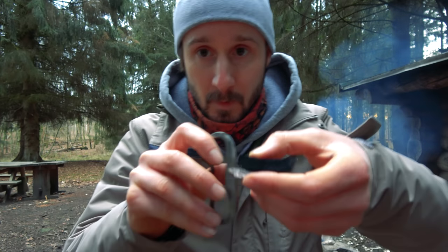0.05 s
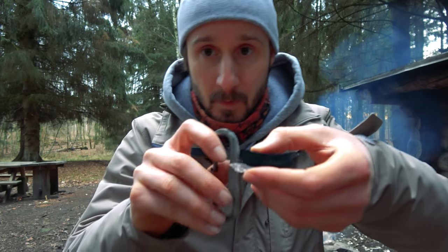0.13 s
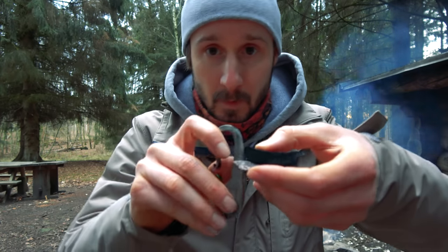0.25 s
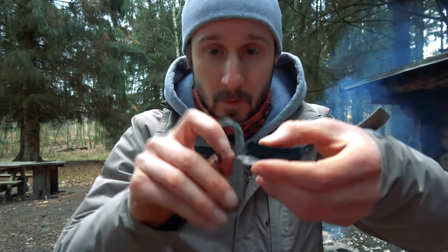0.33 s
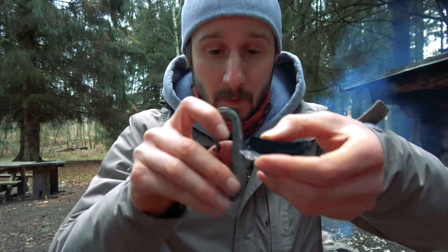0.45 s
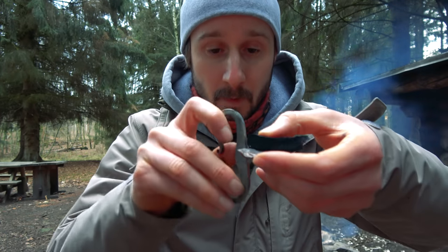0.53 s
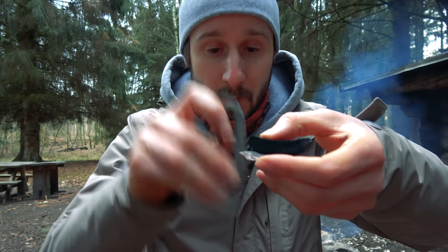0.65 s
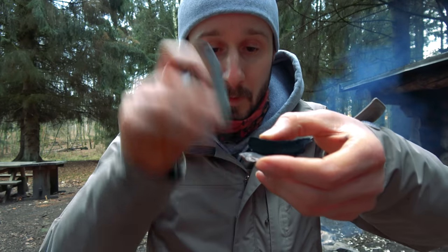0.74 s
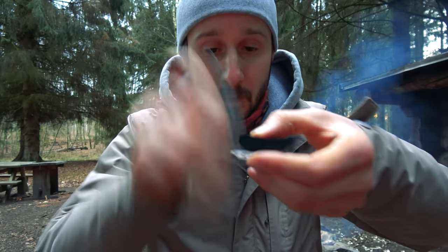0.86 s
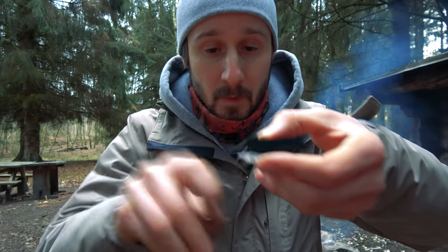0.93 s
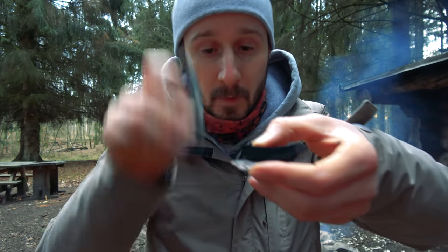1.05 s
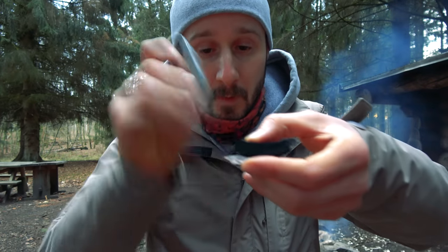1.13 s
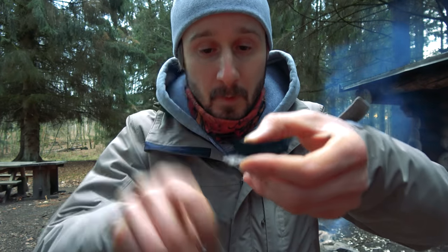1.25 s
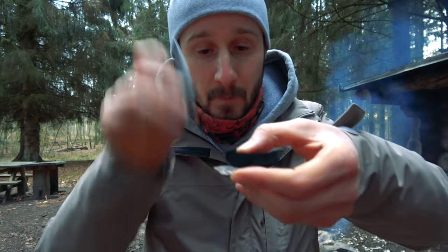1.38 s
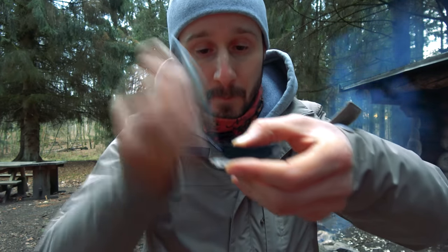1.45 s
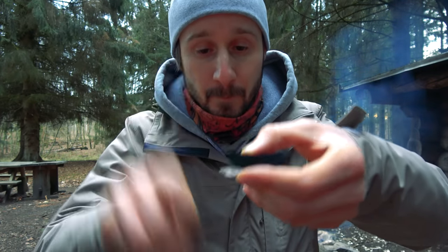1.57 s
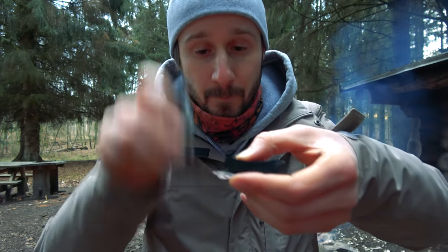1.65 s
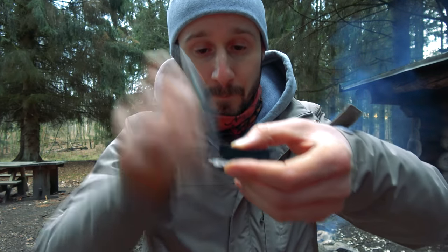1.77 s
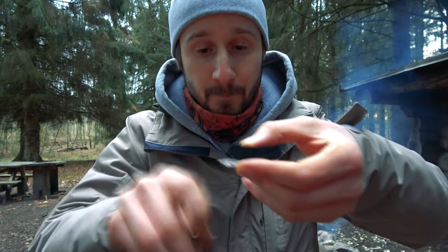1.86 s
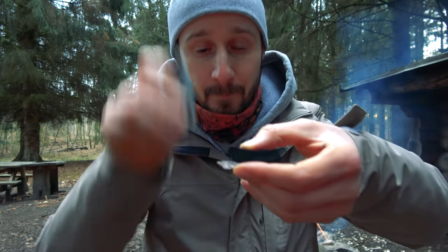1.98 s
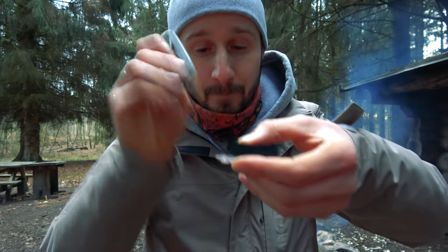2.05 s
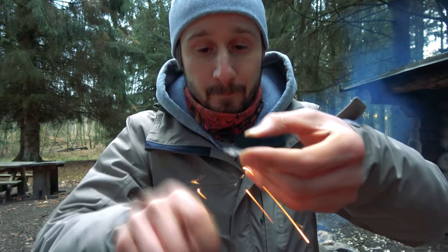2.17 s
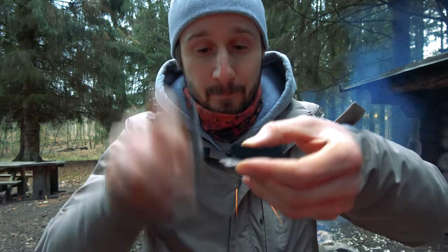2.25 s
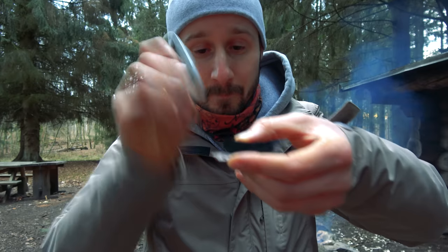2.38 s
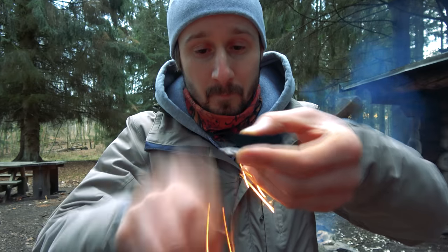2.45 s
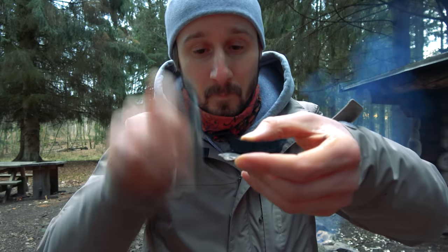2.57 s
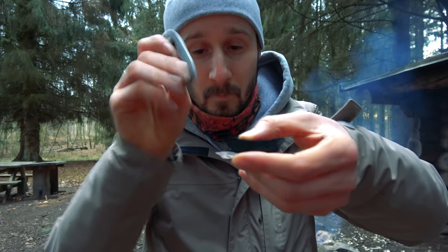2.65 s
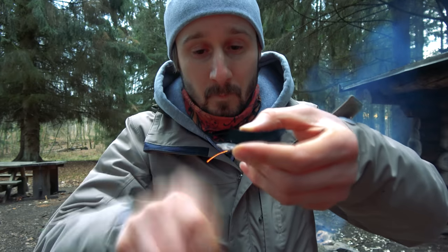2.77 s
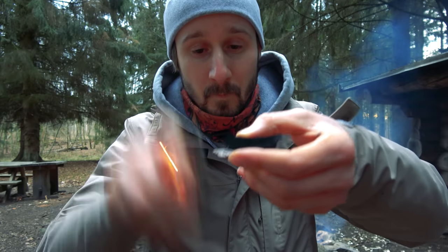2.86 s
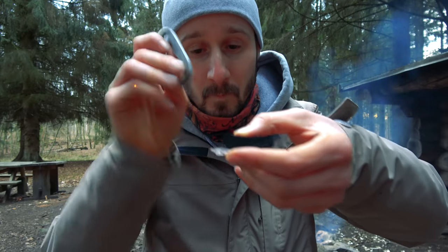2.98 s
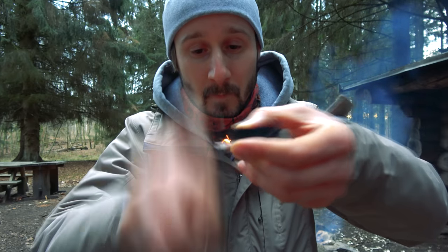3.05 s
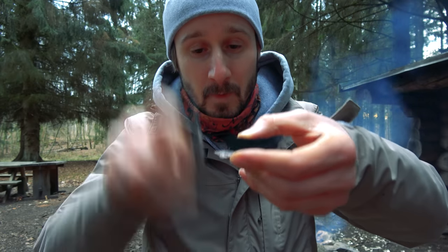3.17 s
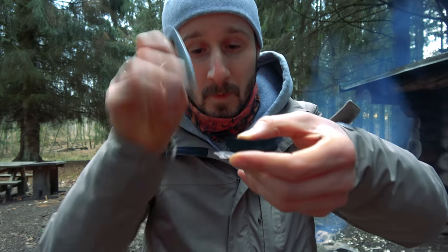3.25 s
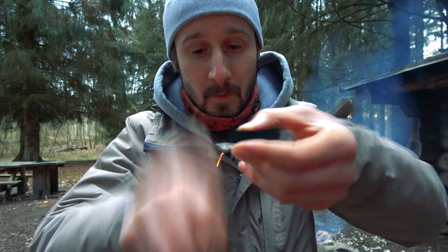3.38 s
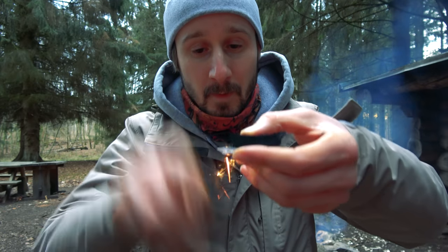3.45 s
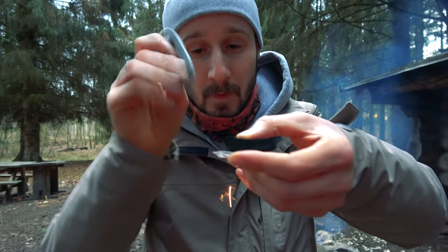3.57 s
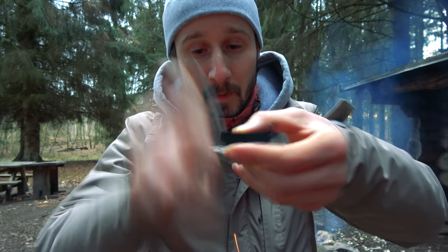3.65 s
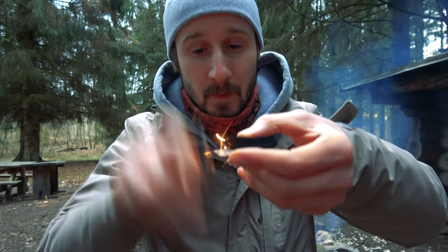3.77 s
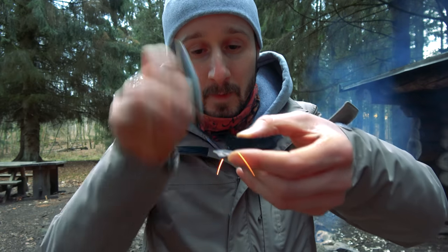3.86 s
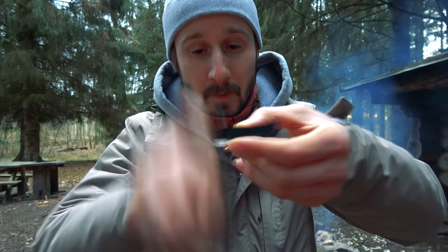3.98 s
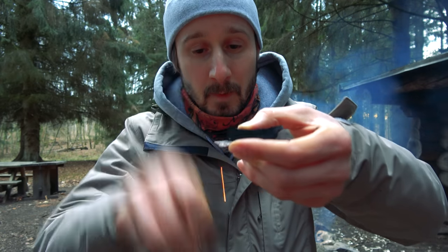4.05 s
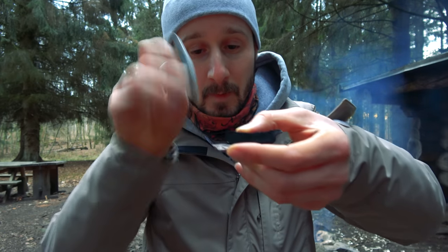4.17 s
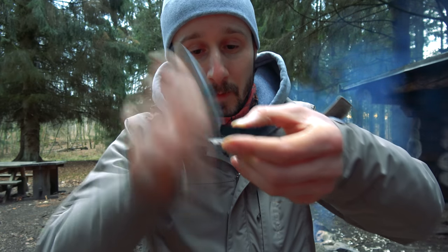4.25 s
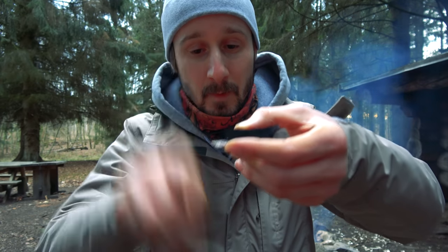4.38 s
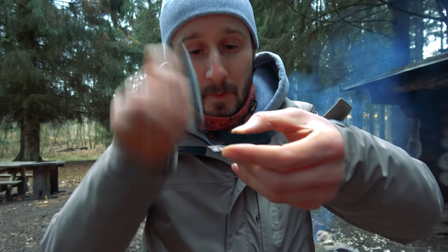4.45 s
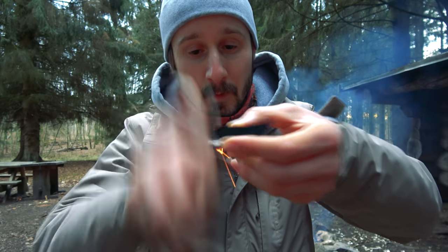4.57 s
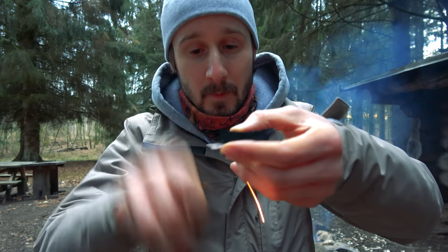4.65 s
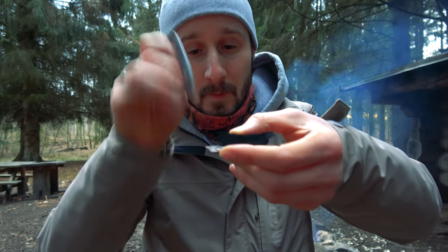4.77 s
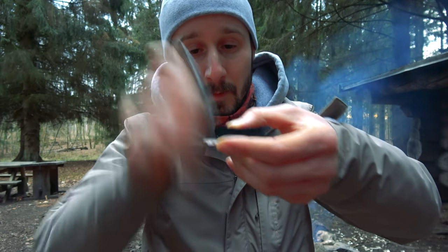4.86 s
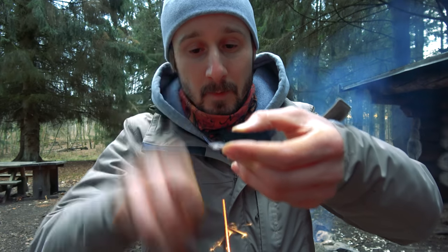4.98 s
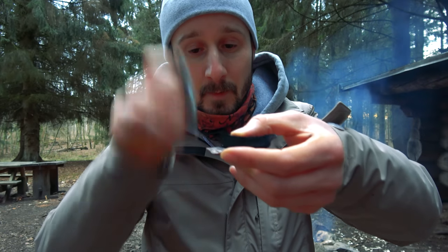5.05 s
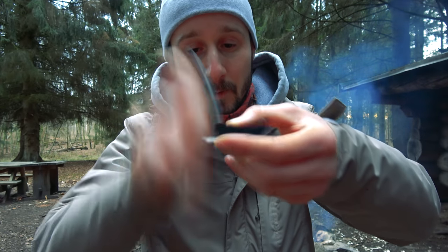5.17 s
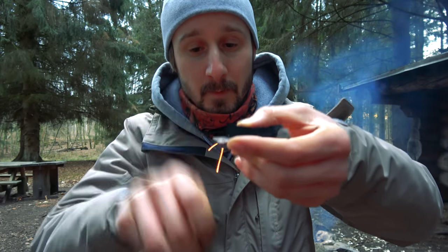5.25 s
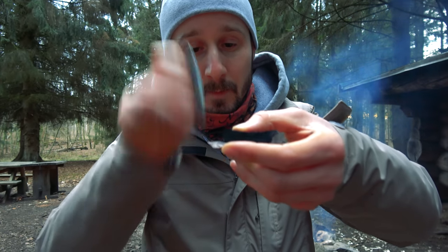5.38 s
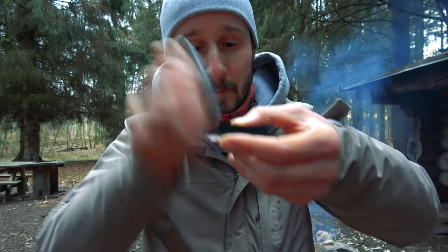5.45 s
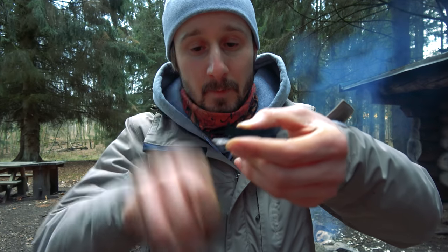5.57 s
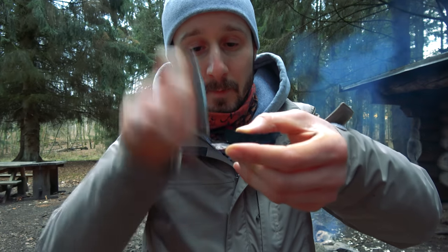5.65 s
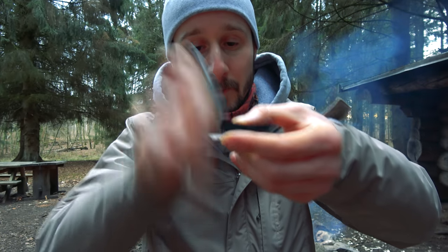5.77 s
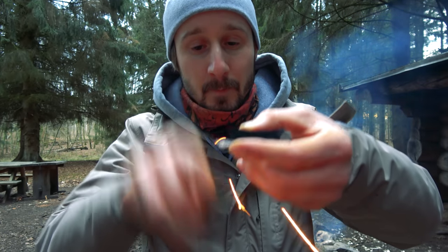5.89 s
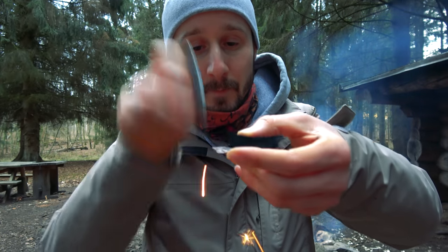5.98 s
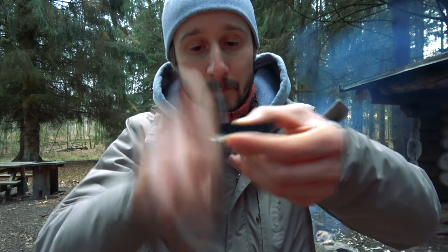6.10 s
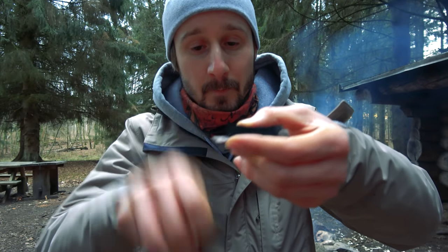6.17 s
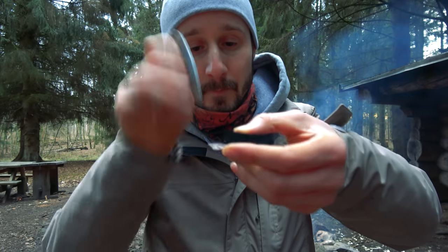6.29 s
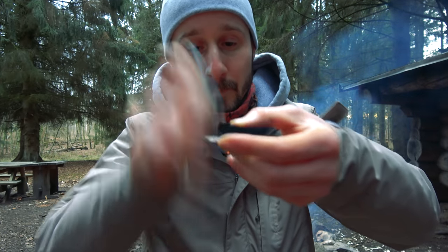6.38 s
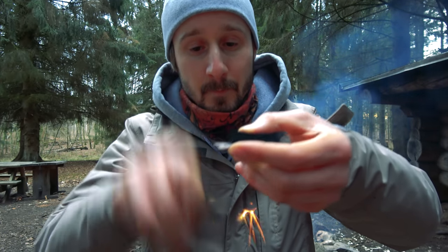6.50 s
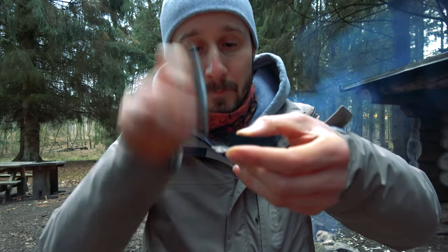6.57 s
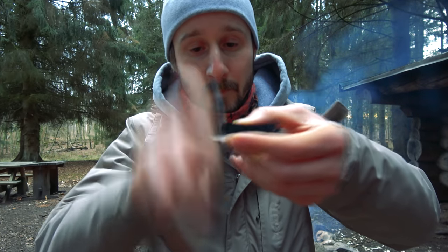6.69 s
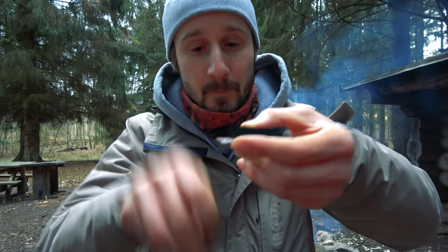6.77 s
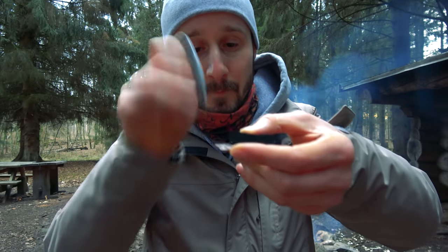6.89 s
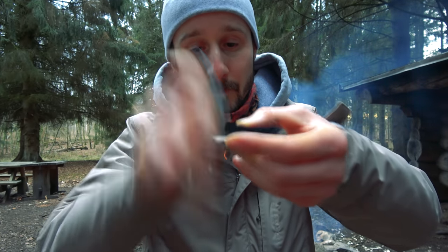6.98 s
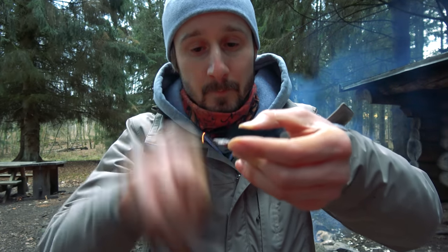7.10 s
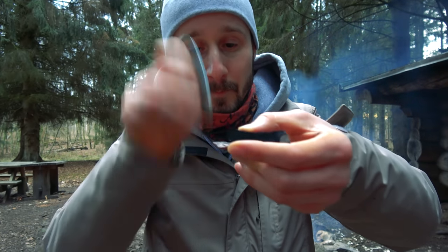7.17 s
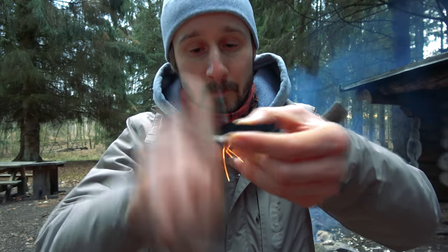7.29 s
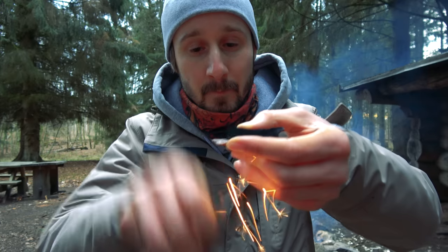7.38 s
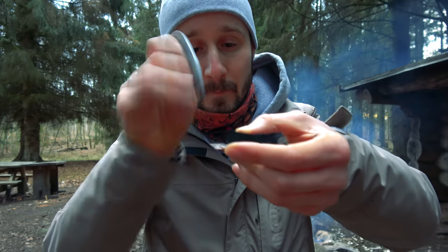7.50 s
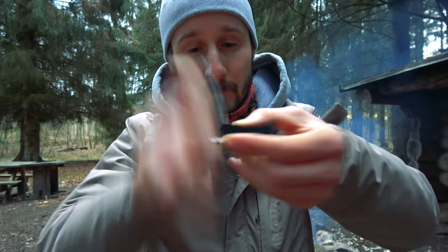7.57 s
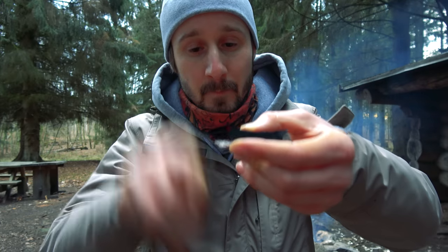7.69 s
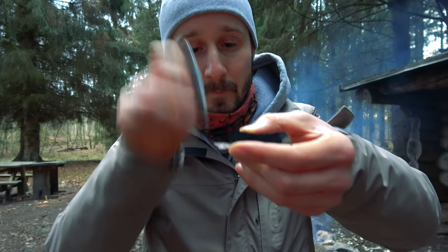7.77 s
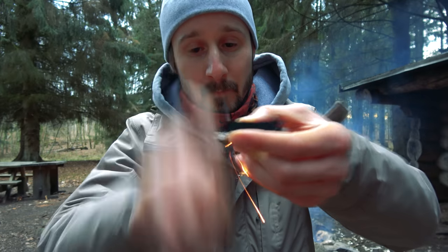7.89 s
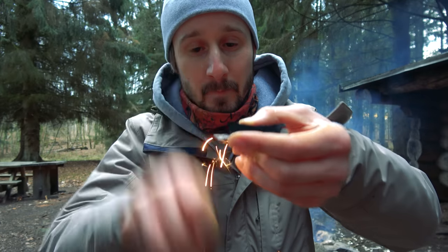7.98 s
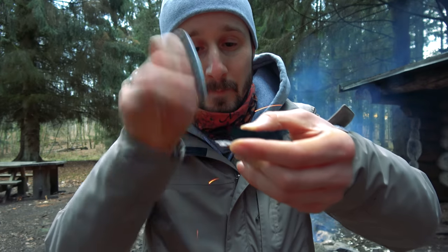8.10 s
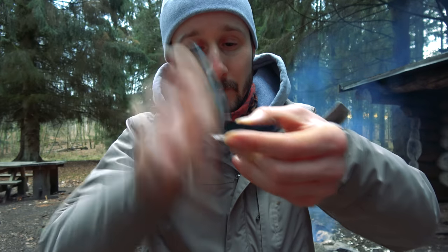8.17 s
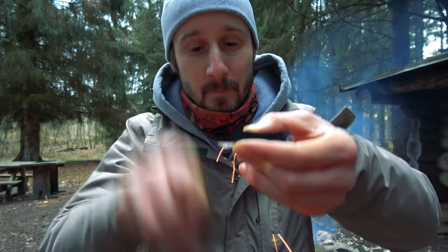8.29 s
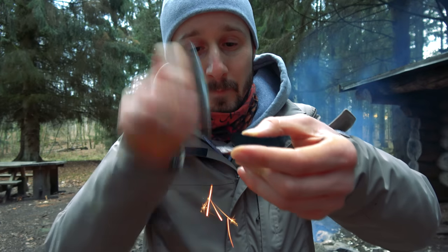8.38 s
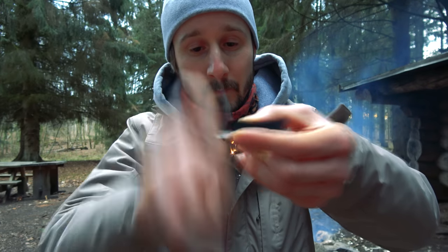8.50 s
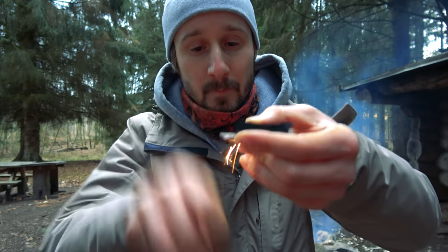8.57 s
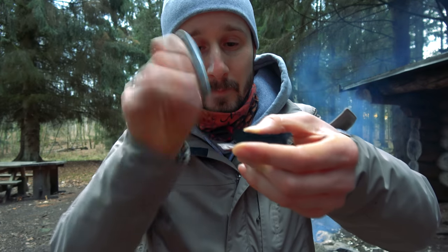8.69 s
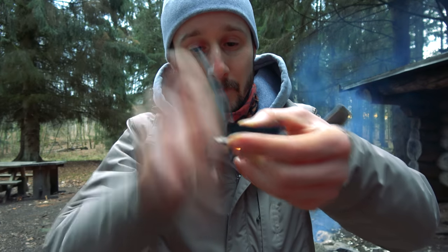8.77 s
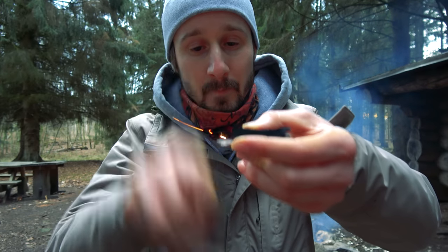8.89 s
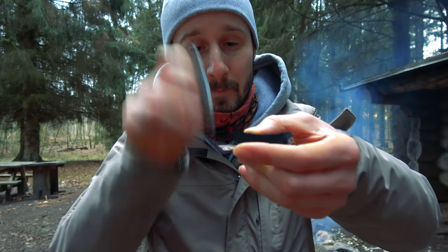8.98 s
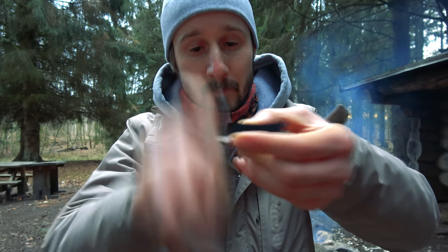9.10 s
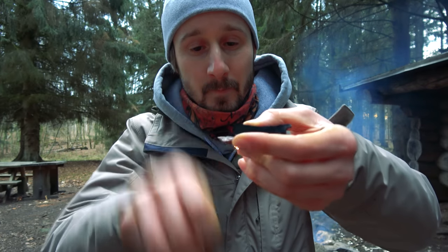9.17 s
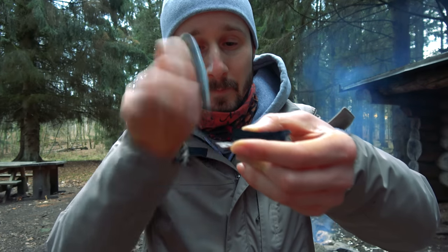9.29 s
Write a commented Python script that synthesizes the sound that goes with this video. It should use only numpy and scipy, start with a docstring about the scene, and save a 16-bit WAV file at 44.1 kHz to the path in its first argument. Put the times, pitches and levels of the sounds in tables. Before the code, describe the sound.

Quick regular strokes of steel on flint, crisp and metallic, with tiny spark ticks, sleeve rustle and soft air puffs outdoors.

```python
"""In a forest clearing, a steel fire striker is struck down the edge of a hand-held flint three times a second.
Each stroke is an impulsive blow and a 20 ms stick-slip scrape; both excite damped modes of steel and stone.
The steel rings on faintly, sparks and stone chips tick, and the moving fist pushes a puff of air.
Between strokes come light ticks and the broadband rustle of a jacket sleeve.
Trees and ground scatter a faint tail of the contacts over a bed of coloured air noise."""
import sys
import numpy as np
from scipy import signal
from scipy.fft import rfft, irfft, next_fast_len
from scipy.io import wavfile

SR = 44100
rng = np.random.default_rng(int(sys.argv[2]) if len(sys.argv) > 2 else 0)


def generate_wav(sig):
    """Save sig (samples, or channels by samples) to the path in sys.argv[1] as 16-bit PCM at SR."""
    pcm = np.round(np.clip(np.atleast_2d(sig).T, -1, 1) * 32767).astype(np.int16)
    wavfile.write(sys.argv[1], SR, pcm)


N = 411894


def from_db(db):
    """Logarithmic level: decibels to amplitude gain."""
    return 10 ** (np.asarray(db) / 20)


def rms_one(x):
    """Normalisation: scale a signal to unit rms."""
    return x / np.sqrt(np.mean(x ** 2) + 1e-20)


def seconds(size):
    """Sampling: the time axis of so many samples, in seconds."""
    return np.arange(size) / SR


def add(out, s, sound):
    """Superposition: mix a sound in from time s."""
    at = max(round(s * SR), 0)
    out[at:at + len(sound)] += sound[:max(N - at, 0)]


def bump(t, at_s, width_s):
    """Gaussian pulse: a smooth swell of height 1."""
    return np.exp(-((t - at_s) / width_s) ** 2)


def coloured(x, spectrum):
    """Spectral shaping: weight a signal by levels interpolated over log frequency; rms 1."""
    hz, db = np.transpose(spectrum)
    size = next_fast_len(len(x))
    bins = np.maximum(np.fft.rfftfreq(size, 1 / SR), 1)
    gain = from_db(np.interp(np.log(bins), np.log(hz), db))
    return rms_one(irfft(rfft(x, size) * gain, size)[:len(x)])


def drift(rate, size):
    """Slow random modulation: normal random values, rate per second, joined by straight lines."""
    knots = rng.standard_normal(int(size / SR * rate) + 2)
    return np.interp(np.arange(size) / SR * rate, np.arange(len(knots)), knots)


def grit(per_s, spread_db, size):
    """Shot noise: tiny fractures at random moments, of uneven size and either sign; rms 1."""
    size_db = spread_db * np.minimum(rng.exponential(1, size), 4)
    fractures = from_db(size_db) * rng.choice([-1, 1], size)
    return rms_one(fractures * (rng.random(size) < per_s / SR))


def resonate(x, hz, width_hz):
    """Damped oscillator: a two-pole resonance with gain 1 at its peak."""
    r = np.exp(-np.pi * width_hz / SR)
    zeros = np.array([1, 0, -1]) * (1 - r * r) / 2
    poles = [1, -2 * r * np.cos(2 * np.pi * hz / SR), r * r]
    return signal.lfilter(zeros, poles, x + 1e-18)


# strokes of steel down the flint; contact levels stand before the trims in strikes():
# (time [s], impact thud [dB], impact clack [dB], impact clink [dB], impact zing [dB], scrape length [s],
#  deepest snag after the blow [s], scrape clack [dB], scrape clink [dB], scrape zing [dB])
STROKES = [(0.9576, -38.5, -24, -20, -14, 0.022, 0.0082, -24.5, -25, -21),
           (1.2735, -38, -25, -19.5, -17.5, .013, .004, -24.5, -23.5, -14),
           (1.5736, -35, -25, -22, -16.5, 0.018, 0.0078, -27.5, -20, -21.5),
           (1.8867, -43, -20, -20, -14.5, 0.023, 0.0099, -31.5, -26.5, -25.5),
           (2.1993, -37, -15.5, -13.5, -12.5, 0.017, .007, -23.5, -20, -21),
           (2.5053, -42.5, -18.5, -18.5, -14, 0.022, 0.0066, -20.5, -18, -22.5),
           (2.8201, -32.5, -20.5, -17.5, -12, .018, 0.0045, -24, -19.5, -17),
           (3.1233, -29.5, -23, -15.5, -9.5, .023, 0.011, -25.5, -21, -21),
           (3.4356, -31.5, -13.5, -9.5, -6.5, 0.017, 0.019, -28, -23.5, -26),
           (3.7425, -30, -14, -9.5, -4, .023, 0.022, -27, -24.5, -26.5),
           (4.0484, -32, -15.5, -14.5, -16, .017, 0.0024, -20.5, -20, -23.5),
           (4.3562, -28.5, -14.5, -14, -9.5, 0.017, 0.0083, -22.5, -17, -24),
           (4.6526, -24, -7, -10.5, -11, 0.02, 0.0089, -26, -24.5, -26),
           (4.963, -48, -15.5, -10.5, -6.5, 0.018, 0.014, -28.5, -24, -29),
           (5.2659, -28, -16, -11, -8.5, .027, 0.0085, -24, -19.5, -16.5),
           (5.568, -33, -15, -13.5, -18, 0.021, .011, -24, -17.5, -17.5),
           (5.8716, -25, -12.5, -8.5, -5.5, 0.025, 0.011, -25, -19.5, -25),
           (6.1711, -32, -13.5, -9.5, -10, .025, 0.0079, -25, -17, -21),
           (6.4709, -31, -12.5, -11, -12.5, .026, 0.0078, -27.5, -22.5, -21),
           (6.7733, -39, -12, -14, -34, .022, 0.0067, -25.5, -20.5, -23.5),
           (7.07, -26.5, -16, -17, -11, .021, 0.0048, -21, -18.5, -22.5),
           (7.3683, -25, -11.5, -12.5, -10, 0.022, 0.0052, -20, -18, -22.5),
           (7.658, -27.5, -21, -28, -10, 0.027, 0.0095, -24.5, -20, -20),
           (7.9657, -27, -20, -18.5, -11, 0.02, 0.0062, -23.5, -18, -19.5),
           (8.2709, -30.5, -13, -10.5, -5.5, .024, .022, -26.5, -19, -24),
           (8.5713, -33.5, -8.5, -10, -21, .021, 0.007, -24, -18.5, -20),
           (8.8687, -39, -10.5, -6, -8.5, 0.022, 0.0056, -26.5, -21.5, -22.5),
           (9.1738, -31, -12.5, -8.5, -9.5, .020, 0.015, -22, -20.5, -24.5)]
# light touches of steel, stone and fingers: (time [s], thud [dB], clack [dB], clink [dB], zing [dB])
TICKS = [(0.181, -43, -30, -53, -46), (0.391, -58, -60, -50, -53), (0.5952, -61, -28.5, -50, -40.5),
         (0.612, -64, -43, -45, -49), (0.7084, -44.5, -64, -66, -69), (3.5273, -47, -45, -46.5, -62),
         (3.5513, -56, -52, -46.5, -54), (3.846, -51, -49, -49, -55), (3.903, -49, -39.5, -39, -45),
         (4.6096, -40, -24, -29, -45), (4.803, -51.5, -47, -51, -61), (5.0766, -47, -38, -42, -53),
         (5.4416, -51, -42, -44.5, -59), (5.7022, -40, -25.5, -26, -38), (6.05, -49, -46, -46, -54),
         (6.5967, -53, -44, -47, -54), (7.2316, -42.5, -31.5, -40, -46.5), (8.1028, -48, -44, -42, -52),
         (8.1286, -43, -46, -44, -56), (8.48, -44.5, -52, -49, -60), (8.512, -61, -45, -45, -47)]
TICK_DAMPING = 2.8  # factor on the mode widths


def strikes():
    """Impact and friction excitation: every blow, scrape and light touch of steel and stone."""
    out = np.zeros(N)
    impact_trim_db, scrape_trim_db = .2, -.2
    for s, thud_db, clack, clink, zing, length, snag_s, *scraping in STROKES:
        impact_db = np.array([clack, clink, zing]) + impact_trim_db
        add(out, s, contact(impact_db, crush_s=0.0011, crush=0.1, damping=1.11))
        add(out, s, from_db(thud_db) * thud(decay_s=0.0016))
        add(out, s, scrape(length, snag_s, np.array(scraping) + scrape_trim_db))
    for s, thud_db, *levels_db in TICKS:
        add(out, s, contact(levels_db, crush_s=0.0024, crush=0.25, damping=TICK_DAMPING))
        add(out, s, from_db(thud_db) * thud(decay_s=0.0022))
    return out


def contact(levels_db, crush_s, crush, damping):
    """Impulse excitation: one sharp blow with a decaying burst of crumbling at the flint's edge."""
    t = seconds(size=1200)
    force = crush * grit(per_s=16000, spread_db=1.5, size=len(t)) * np.exp(-t / crush_s)
    force[0] -= 1  # the blow itself
    return steel_and_flint(force, levels_db, .0036, damping, chatter_db=0.0, uneven_db=2.7)


# the edge bites in, loses speed and catches once more as the steel runs off
BITE_S, SCRAPE_FADE_DB, RELEASE_S = 0.0026, 4.0, 0.0023
LAST_CATCH_DB, CATCH_S = 4, 0.0026
SNAG_DB, SNAG_S = 7, .0018  # where the edge digs deepest
SLIPS_PER_S, SLIP_DB = 400, 1.0  # uneven grip of the edge
DRAG_DB = -43.5  # the scrape as the hands take it up, before the pressure


def scrape(length, snag_s, levels_db):
    """Stick-slip friction: the edge shaves the steel unevenly, snags, and catches again as it runs off."""
    t = seconds(size=2400)
    snag_db = SNAG_DB * bump(t, snag_s, SNAG_S)
    catch_db = LAST_CATCH_DB * bump(t, length - CATCH_S, CATCH_S)
    grip_db = snag_db + catch_db - SCRAPE_FADE_DB * t / length
    release = np.exp(-np.maximum(t - length + .001, 0) / RELEASE_S)
    touching = np.clip(t / BITE_S, 0, 1) * release
    pressure = touching * from_db(grip_db + SLIP_DB * drift(SLIPS_PER_S, len(t)))
    force = grit(per_s=10000, spread_db=3.5, size=len(t)) * pressure
    drag = from_db(DRAG_DB) * pressure * coloured(rng.standard_normal(len(t)), THUD)
    ringing = steel_and_flint(force, levels_db, length, damping=1.15, chatter_db=2.6, uneven_db=2.0)
    return drag + ringing


# modes of steel and flint damped by the fingers, in three registers; widths before the damping factor,
# levels relative within a register: (centre [Hz], width [Hz], level [dB])
CLACK_MODES = [(580, 270, -21.5), (1622, 410, -12.5), (2087, 310, -3), (2657, 180, -1.5), (3165, 970, -6.5)]
CLINK_MODES = [(3670, 770, -17), (4294, 240, 1.5), (4667, 200, 0.5), (5337, 500, -5), (6230, 1000, -12.5),
               (7070, 930, -5.5), (7710, 420, 0.5), (8194, 320, 3.5)]
ZING_MODES = [(10805, 160, 2.5), (11120, 240, -0.5), (12000, 430, -7), (12600, 660, -9.5),
              (14750, 900, -13.5)]
# band of force that drives each register: (low edge [Hz], high edge [Hz])
REGISTERS = [(200, 4660), (3000, 6770), (10100, 17000)]


def steel_and_flint(force, levels_db, span, damping, chatter_db, uneven_db):
    """Modal synthesis: a force rings modes shifted by grip; levels are rms over the first span seconds."""
    out = 0
    for modes, edges, level_db in zip((CLACK_MODES, CLINK_MODES, ZING_MODES), REGISTERS, levels_db):
        # stick and slip feed each register in turns of its own
        slips = from_db(chatter_db * drift(532, len(force)))
        band = signal.butter(2, edges, "band", fs=SR)
        drive = signal.lfilter(*band, force * slips)
        register = 0
        for hz, width_hz, db in modes:
            shift, strength = rng.standard_normal(2)
            centre = hz + .25 * width_hz * shift
            mode = resonate(drive, centre, width_hz * damping)
            register = register + from_db(db + uneven_db * strength) * mode
        span_rms = np.sqrt(np.mean(register[:int(span * SR)] ** 2))
        out = out + from_db(level_db) * register / span_rms
    return out


# spectrum of the hands taking up blow and scrape: (frequency [Hz], relative density [dB per Hz])
THUD = [(30, -6), (120, 2), (300, 1.5), (620, 3), (950, -2), (1500, -10.5), (4000, -30.5)]


def thud(decay_s):
    """Damped mass response: a dull knock of the hands behind the stone; rms 1 over its first 8 ms."""
    t = seconds(size=1500)
    force = grit(per_s=12000, spread_db=4.5, size=len(t)) * np.exp(-t / decay_s)
    knock = coloured(np.pad(force, (100, 0)), THUD)[100:]
    return knock / np.sqrt(np.mean(knock[:350] ** 2))


# crowd of close modes in the steel: (frequency [Hz], relative density [dB per Hz])
RING = [(8500, -32), (9700, -13), (10500, -9), (10950, 0), (11250, -3), (11700, -25), (14000, -45)]
# starting level of the after-ring at the usual scrape length, set by the grip: (time [s], level [dB])
LOOSENESS = [(1.0, -64.5), (1.9, -62), (2.8, -53), (5.8, -52.5), (6.8, -59.5), (7.6, -51), (9.2, -56.5)]
RING_DB_PER_S, USUAL_SCRAPE_S, RING_T60_S = 1000, .022, .28  # first: dB per second of extra scrape


def after_ring():
    """Exponential decay: the zing rings on, louder for a looser grip and a longer scrape."""
    out, t = np.zeros(N), seconds(size=12000)
    for s, _, _, _, _, length, *_ in STROKES:
        grip_db = np.interp(s, *np.transpose(LOOSENESS))
        start_db = grip_db + RING_DB_PER_S * (length - USUAL_SCRAPE_S)
        ring = coloured(rng.standard_normal(len(t)), RING)
        add(out, s + length, from_db(start_db - 60 * t / RING_T60_S) * ring)
    return out


# spectrum of sparks and stone chips: (frequency [Hz], relative density [dB per Hz])
CRACKLE = [(500, -14), (2000, 0), (5000, -2), (8200, -3), (10000, -8), (13000, -7), (16000, -12)]


def sparks(count, spark_db, uneven_db, pop_s):
    """Random impulses: hot shavings and chips tick as they burst or land, louder after a harder clack."""
    out, t = np.zeros(N), seconds(size=600)
    for s, _, clack_db, *_ in STROKES:
        shower_db = spark_db + .8 * clack_db
        for late, strength in rng.standard_normal((count, 2)):
            flight_s = .1 * np.exp(.35 * late)
            pop = coloured(rng.standard_normal(len(t)), CRACKLE) * np.exp(-t / pop_s)
            add(out, s + flight_s, from_db(shower_db + uneven_db * strength) * pop)
    return out


# air pushed by the fist as the swing gets freer, before the crest gain: (time [s], level [dB])
PUFF = [(1.0, -44.5), (3.0, -41), (9.2, -38.5)]


def air_puffs(delay_s, width_s, puff_hz, crest_db):
    """Near-field flow: the passing fist makes a slow swell, suck and swell of pressure at the microphone."""
    out, t = np.zeros(N), seconds(size=6000)
    for s, *_ in STROKES:
        late, speed, strength = rng.standard_normal(3)
        u = (t - delay_s - .002 * late) * np.exp(0.18 * speed)
        puff_db = np.interp(s, *np.transpose(PUFF)) + crest_db + 1.5 * strength
        swell = bump(u, 0, width_s) * np.cos(2 * np.pi * puff_hz * u + .7)
        add(out, s, -from_db(puff_db) * swell)
    return out


# how hard the arm works the jacket, before the gains in sleeve():
# (time [s], sleeve rustle [dB], low ruffle [dB])
ARM = [(0.0, -58.5, -48), (0.85, -62.5, -48.5), (2.0, -77, -59), (2.8, -64, -54.5), (3.702, -58.5, -51.5),
       (4.6, -60.5, -49.5), (5.6, -56, -50), (6.75, -61.5, -47), (7.4, -54.5, -52.5), (8.5, -61, -48.5),
       (9.34, -59.5, -51.5)]
# spectra of the cloth's hiss and crinkle, and of its flapping: (frequency [Hz], relative density [dB per Hz])
SLEEVE = [(300, 4.5), (800, 10), (2000, 2.5), (4800, -0.5), (6300, -4), (8400, 1), (9600, -10.5),
          (12700, -5.5), (14000, -9.5), (15500, -12.5)]
RUFFLE = [(25, 12), (60, 2), (150, 0.5), (260, -1), (450, -11.5), (1000, -47)]


def sleeve(rustle_db, ruffle_db, crinkle_db):
    """Modulated friction noise: jacket cloth hisses, crinkles and flaps as the arm swings."""
    s, *columns = np.transpose(ARM)
    rustle, ruffle = [from_db(np.interp(seconds(N), s, c)) for c in columns]
    hiss = from_db(rustle_db + 2.2 * drift(18, N)) * coloured(rng.standard_normal(N), SLEEVE)
    folds = grit(per_s=900, spread_db=4.5, size=N) * from_db(7 * drift(90, N))
    crinkles = from_db(crinkle_db) * coloured(folds, SLEEVE)
    flaps = from_db(ruffle_db + 3.7 * drift(25, N)) * coloured(rng.standard_normal(N), RUFFLE)
    return rustle * from_db(swing_db()) * (hiss + crinkles) + ruffle * flaps


# sleeve level as the arm goes up, rests at the top and comes down: (time after the blow [s], level [dB])
SWING = [(0.0, -1), (0.09, -6.5), (0.17, -3.5), (0.22, 1), (0.265, -6), (0.3, 2.5)]


def swing_db():
    """Periodic modulation: the arm's speed as a level, restarted at each blow; 0 dB before the first."""
    t = seconds(N)
    blows = np.array([0] + [row[0] for row in STROKES])
    since = t - blows[np.searchsorted(blows, t, side="right") - 1]
    return np.interp(since, *np.transpose(SWING)) * (t > blows[1])


# spectrum of scattering by trunks and ground: (frequency [Hz], relative level [dB])
FOREST = [(200, 2.5), (1000, 12.5), (2700, -2.5), (5300, 0.5), (8000, 0), (11000, -9.5), (16000, -2)]


def forest(x, t60, early_s, early_db, tail_db):
    """Scattering by convolution: quick echoes, then a thin tail; paths shift as the hands move each stroke."""
    out, t = np.zeros(N), seconds(size=14000)
    early = from_db(early_db) * np.exp(-t / early_s)
    tail = from_db(tail_db - 60 * t / t60)
    fading = (early + tail) * (t > .003)
    starts = [0] + [round(row[0] * SR) for row in STROKES]
    for start, stretch in zip(starts, np.split(x, starts[1:])):
        echoes = coloured(grit(per_s=7000, spread_db=4.0, size=len(t)), FOREST) * fading
        add(out, start / SR, signal.fftconvolve(stretch, echoes))
    return out


# spectrum of the forest air: (frequency [Hz], relative density [dB per Hz])
AIR = [(12, -31), (20, 2), (59, -3), (260, -10), (363, -13.5), (850, -12.5), (1460, -20), (3370, -27.5),
       (6050, -30), (7990, -27), (9710, -37), (12800, -34.5), (15600, -43)]


def forest_air(level_db):
    """Stationary coloured noise: the steady, mostly low sound of the clearing."""
    return from_db(level_db) * coloured(rng.standard_normal(N), AIR)


def scene():
    """Superposition: striker, arm and forest summed at one close microphone."""
    steel = strikes()
    tail = forest(steel, t60=.31, early_s=0.017, early_db=-51.0, tail_db=-64.0)
    crackle = sparks(count=10, spark_db=-39.5, uneven_db=3, pop_s=.0022)
    puffs = air_puffs(delay_s=.041, width_s=0.0078, puff_hz=32.4, crest_db=7.5)
    cloth = sleeve(rustle_db=1.5, ruffle_db=0.0, crinkle_db=-8)
    air = forest_air(level_db=-52)
    return (steel + after_ring() + tail + crackle + puffs + cloth + air)[None]


CUTOFF_HZ = 15950


def record(dry):
    """Overload and band limiting: peaks beyond full scale clip, then a steep low-pass cuts the top."""
    clipped = np.clip(dry, -1, 1)
    low_pass = signal.ellip(10, .1, 70, CUTOFF_HZ, fs=SR, output="sos")
    return signal.sosfilt(low_pass, clipped)


dry = scene()
out = record(dry)
generate_wav(out)
```